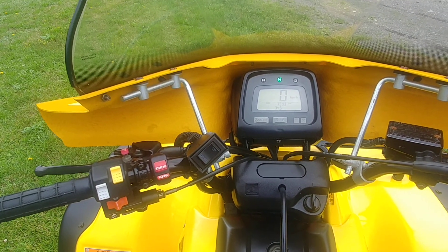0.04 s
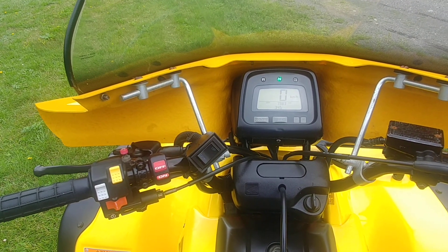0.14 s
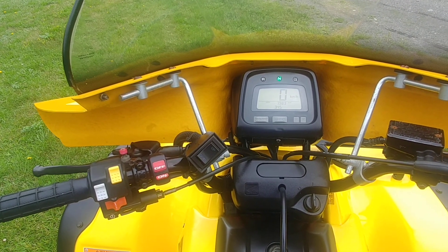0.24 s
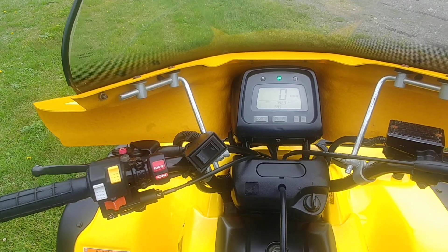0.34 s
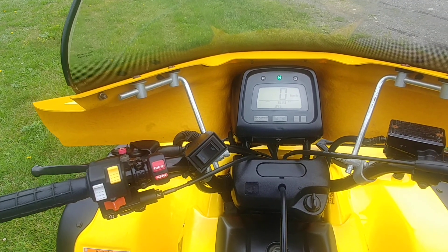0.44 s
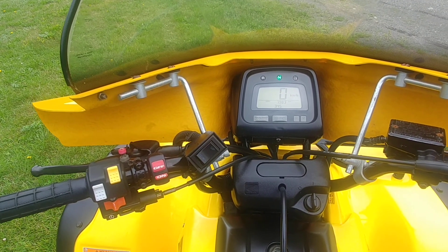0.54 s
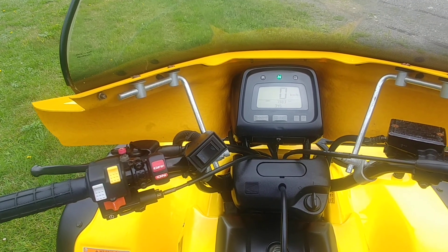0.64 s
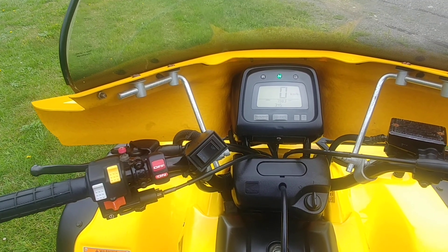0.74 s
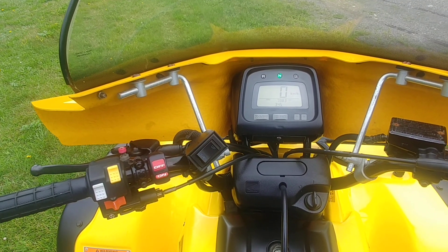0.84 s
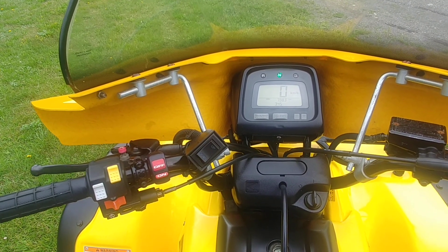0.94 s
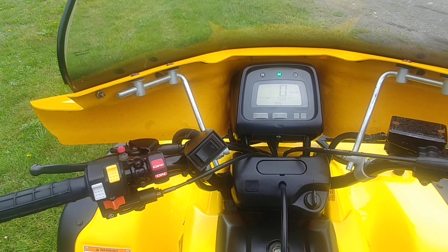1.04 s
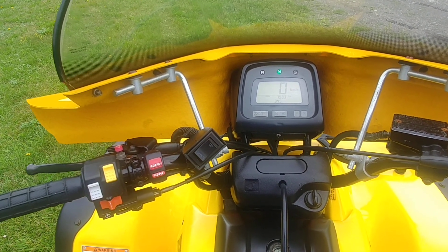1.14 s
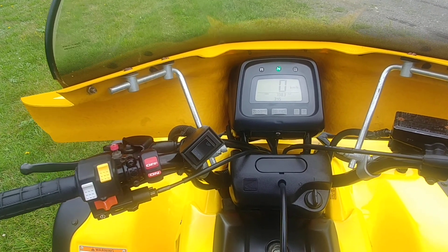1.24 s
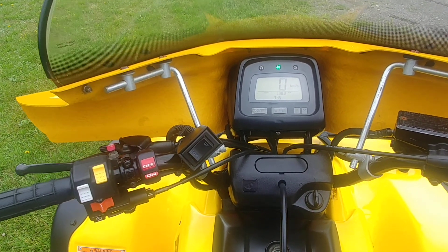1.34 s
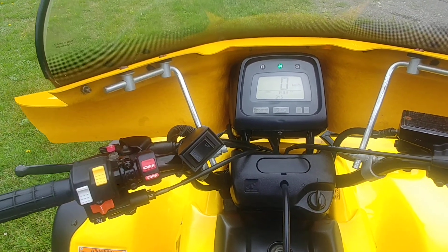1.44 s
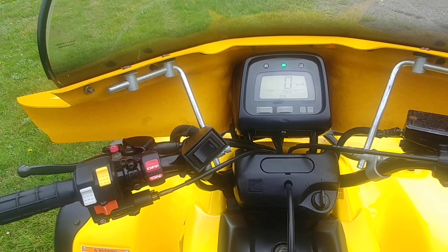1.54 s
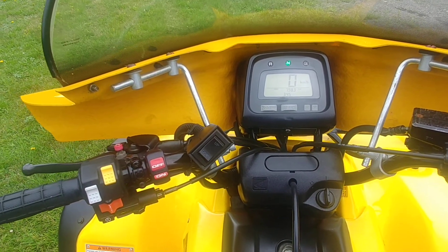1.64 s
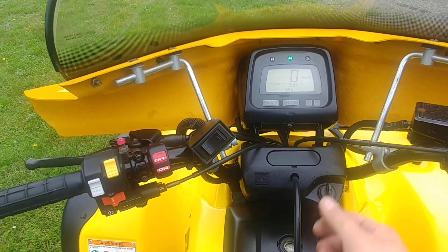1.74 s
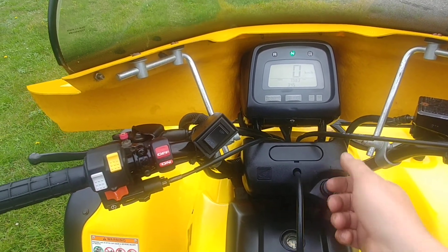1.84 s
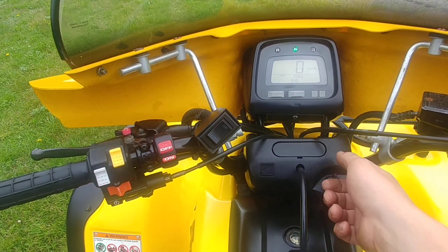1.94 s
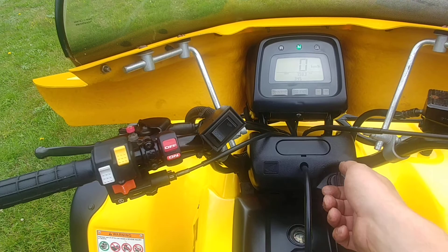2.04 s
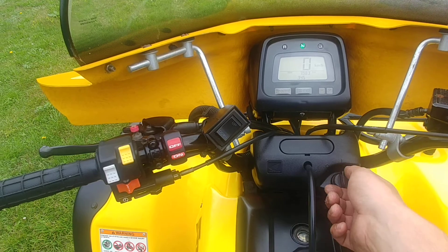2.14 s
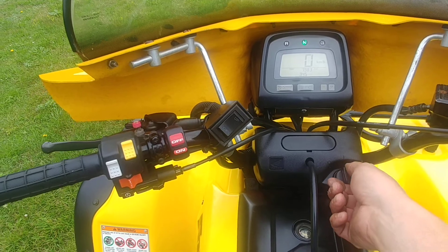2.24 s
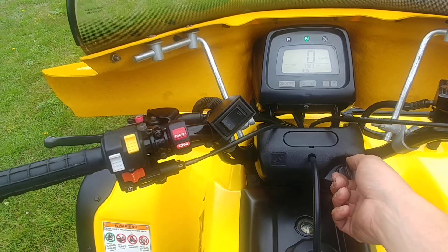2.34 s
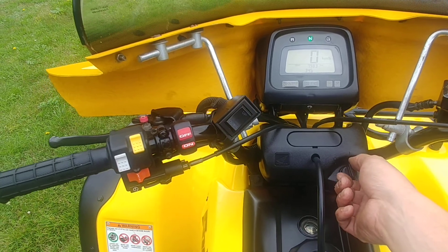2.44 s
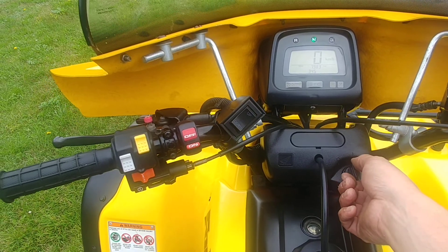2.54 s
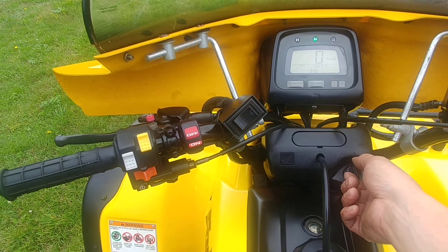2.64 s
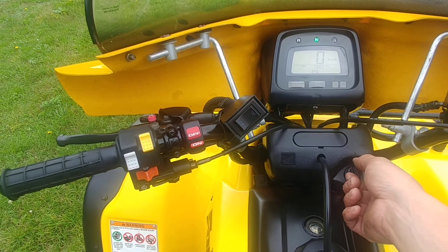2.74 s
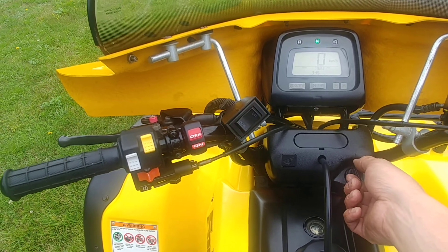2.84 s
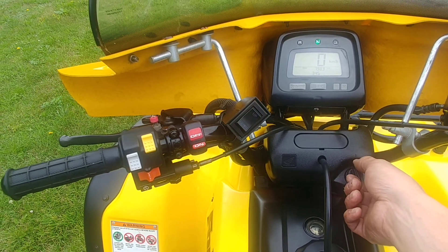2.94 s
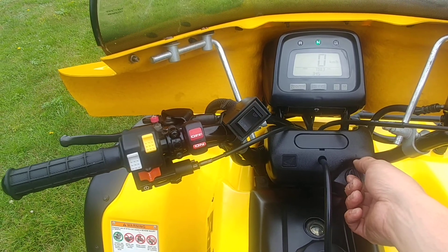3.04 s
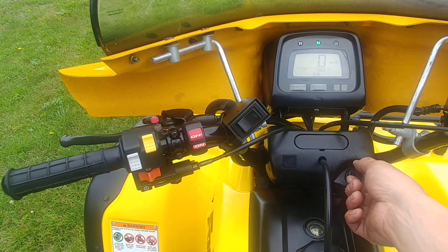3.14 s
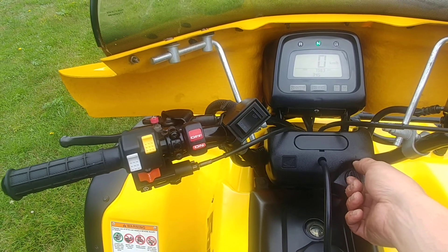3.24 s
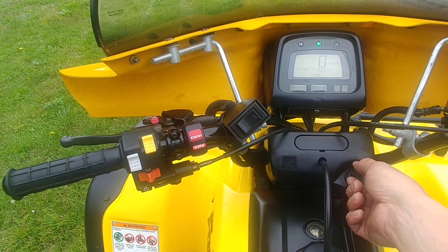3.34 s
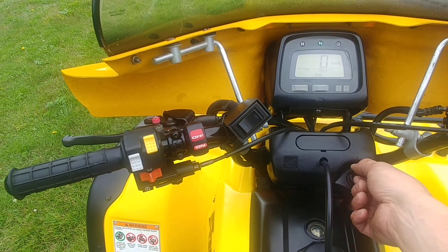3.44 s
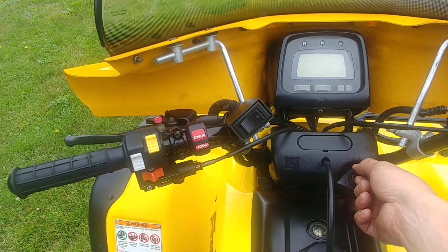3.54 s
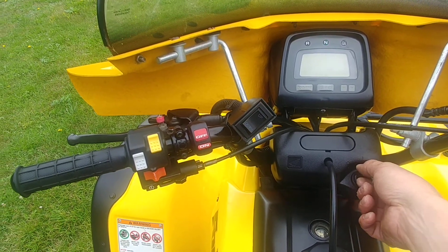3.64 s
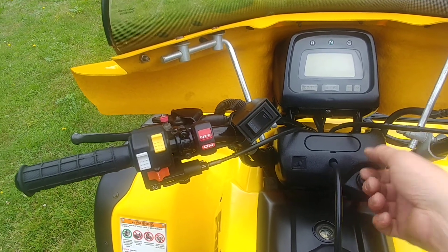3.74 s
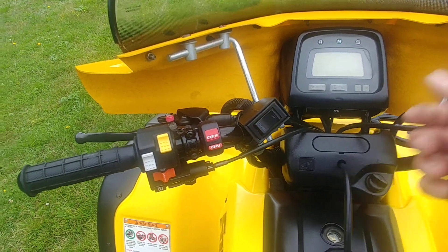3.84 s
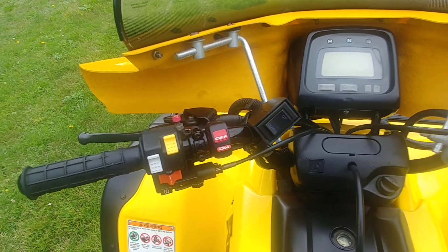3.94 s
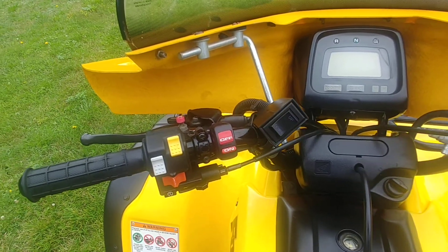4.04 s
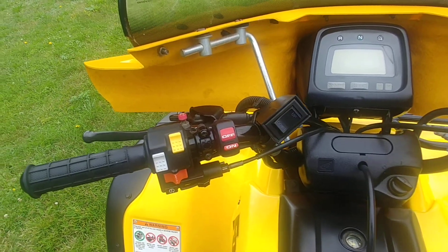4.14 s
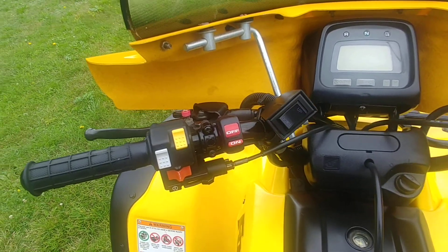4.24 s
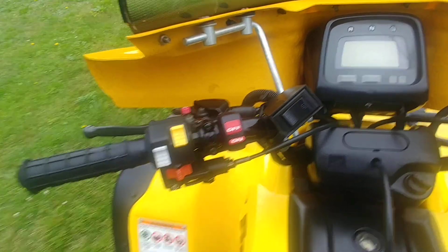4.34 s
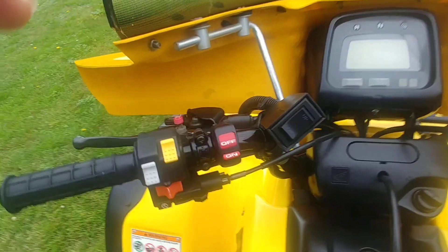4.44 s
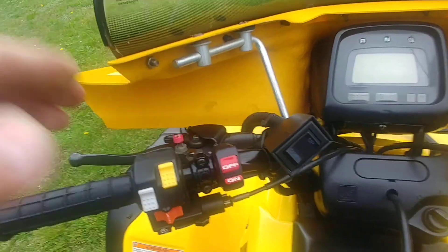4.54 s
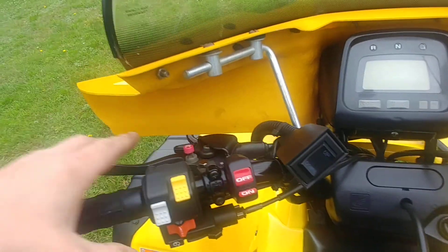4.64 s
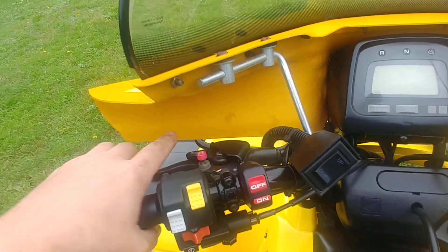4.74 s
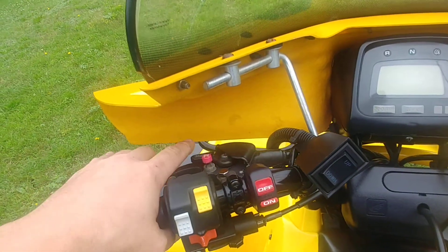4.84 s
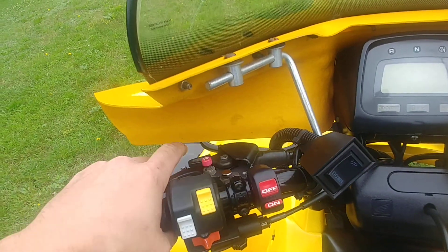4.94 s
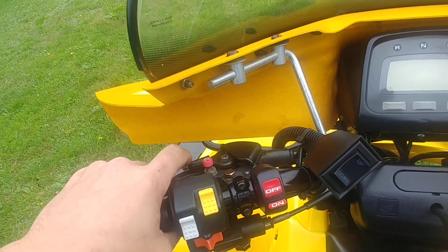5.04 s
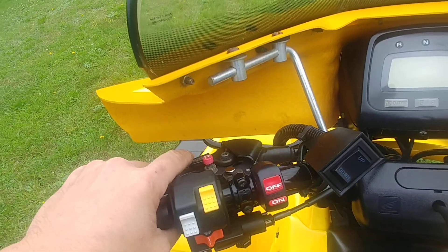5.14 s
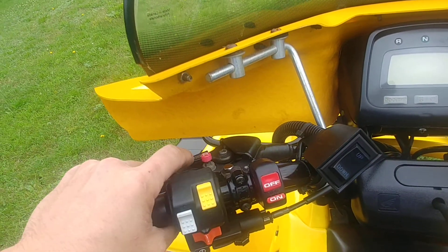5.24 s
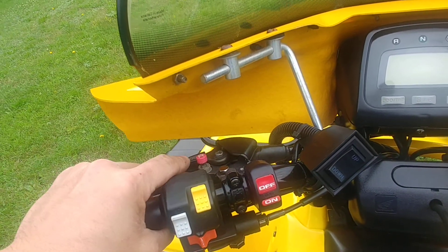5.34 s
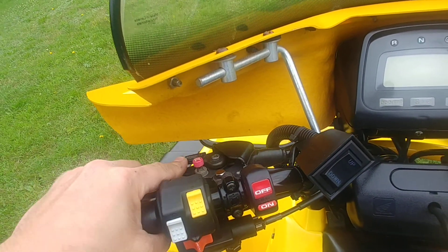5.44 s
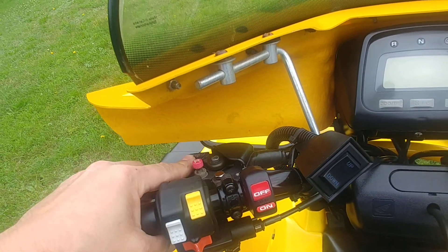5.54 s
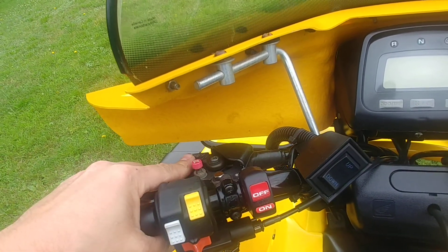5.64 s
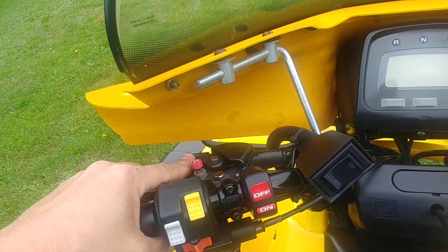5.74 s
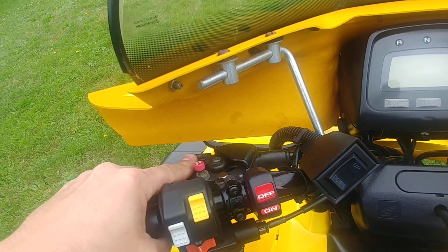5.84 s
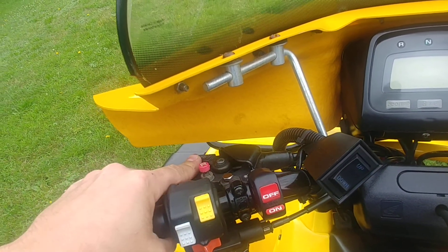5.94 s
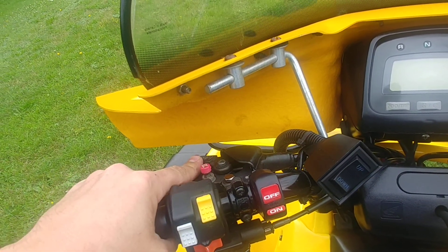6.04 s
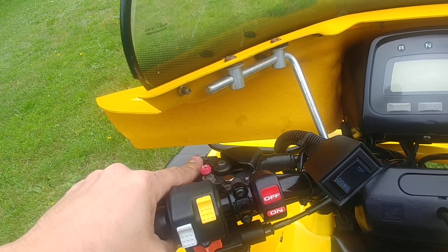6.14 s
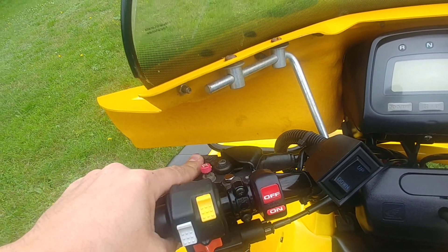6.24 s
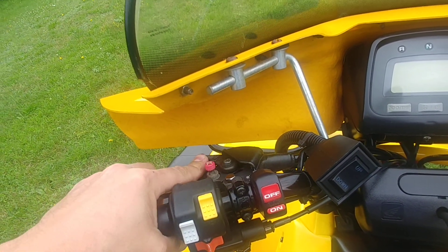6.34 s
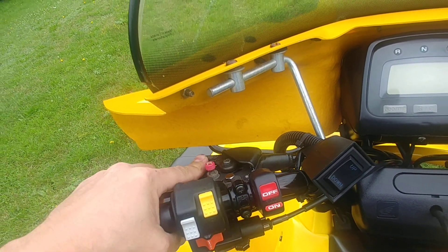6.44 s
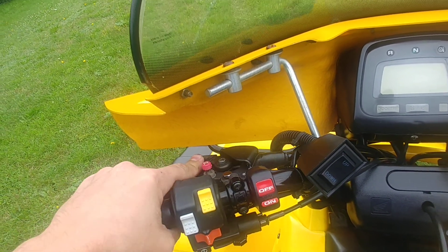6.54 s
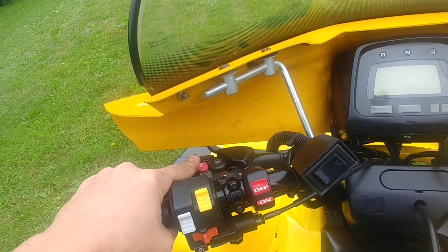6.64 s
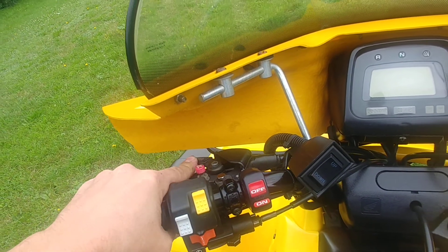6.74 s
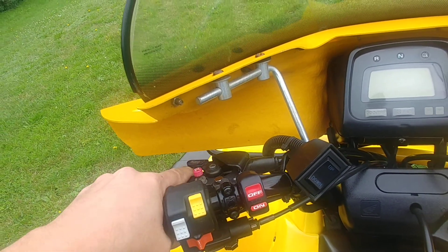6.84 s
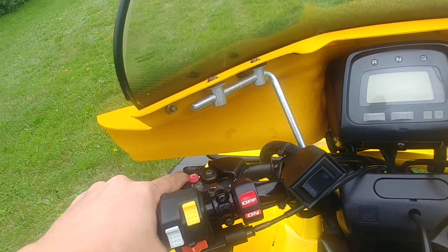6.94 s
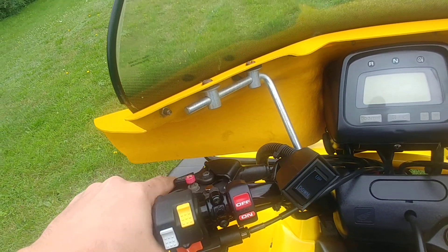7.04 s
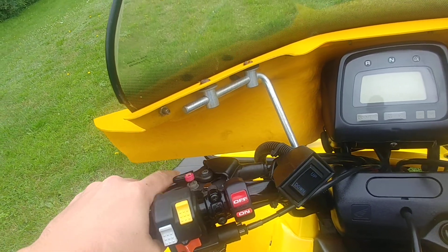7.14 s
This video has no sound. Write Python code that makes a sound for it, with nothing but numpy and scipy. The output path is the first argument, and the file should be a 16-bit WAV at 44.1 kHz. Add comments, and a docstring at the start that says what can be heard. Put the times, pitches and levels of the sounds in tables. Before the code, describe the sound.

Close, hand-held outdoor pickup on a quad bike. A single-cylinder engine chugs loudly at about eleven thumps a second, with valve clatter, hiss and whirr. A key clicks, the beats slow and fade, and the crank kicks back with a short grating ratchet. Then near quiet: clothing rustle, soft knocks, a creaking seat and crisp lever clicks. The left side is brighter; the right is duller, shaded by the hand.

```python
"""Quad bike shut-down

A single-cylinder quad bike idles under a hand-held phone; the key is turned, the engine runs down and kicks back.
Each firing puffs into ringing exhaust modes; noise gated by the engine cycle makes valve clatter, gas hiss and whirr.
The rider shifts in filtered noise, the seat creaks by stick-slip, and levers, knocks and taps ring short modes.
What lies below the phone reaches the right microphone port round the hand: dull, late and blurred.
"""
import sys
import numpy as np
from scipy import signal
from scipy.fft import rfft, irfft
from scipy.io import wavfile
from scipy.ndimage import uniform_filter1d

SR = 44100
rng = np.random.default_rng(int(sys.argv[2]) if len(sys.argv) > 2 else 0)


def volts_from_db(level):
    """Convert decibel levels to linear amplitude ratios."""
    exponent = np.asarray(level, float) / 20
    return 10 ** exponent


def transcribe(u):
    """Save the signal u as a 16-bit wav file named by the first command-line argument.

    u: samples, shape (n,) or (channels, n), limited to [-1, 1]; the rate is SR.
    q: integer samples, one column per channel.
    """
    v = np.clip(np.atleast_2d(u).T, -1, 1)
    q = np.round(v * 32767).astype(np.int16)
    wavfile.write(sys.argv[1], SR, q)


N = 317961
CLOCK = np.arange(N) / SR  # s
SPARK_OFF_S = 3.6
IDLE_PER_S = 11  # firings per second taken as the normal idle


def curve(table):
    """Interpolate each column of a table with times in its first column to every sample."""
    s, *columns = np.transpose(table)
    return [np.interp(CLOCK, s, column) for column in columns]


def colour(x, points):
    """Causal filter through (Hz, dB) points, from the cepstrum of the log gain."""
    hz, db = np.transpose(points)
    grid = np.maximum(np.fft.rfftfreq(8192, 1 / SR), 1)
    log_gain = np.interp(np.log(grid), np.log(hz), db) * np.log(10) / 20
    ceps = irfft(log_gain)
    # folding the cepstrum makes the filter minimum phase
    ceps[1:4096] *= 2
    ceps[4097:] = 0
    return signal.fftconvolve(x, irfft(np.exp(rfft(ceps))))[:N]


def unit(x):
    """Scale to rms 1."""
    return x / np.sqrt(np.mean(x ** 2))


def grit(scatter_db):
    """Noise of tiny impacts whose sizes have a long tail."""
    return unit(rng.standard_normal(N) * volts_from_db(scatter_db * rng.exponential(size=N)))


def walk(rate):
    """Random levels held 1 / rate s and slewed twice."""
    hold = int(SR / rate)
    steps = np.repeat(rng.standard_normal(N // hold + 1), hold)
    return uniform_filter1d(uniform_filter1d(steps, hold), hold)[:N]


def ring(modes, signs=1):
    """Response of a set of (Hz, dB, t60 s) modes to one tap."""
    hz, db, t60 = np.transpose(modes)[:, :, None]
    t = np.arange(SR // 3) / SR
    decay = np.exp(-np.log(1000) * t / t60)
    return (signs * volts_from_db(db) * np.sin(2 * np.pi * hz * t) * decay).sum(axis=0)


def alternating(modes):
    """Signs that make neighbouring modes swing in opposite senses."""
    return (-1.) ** np.arange(len(modes))[:, None]


def sides(left_minus_right_db):
    """Left and right gains, sharing a level difference equally."""
    return volts_from_db(np.array([[left_minus_right_db], [-left_minus_right_db]]) / 2)


def add(track, s, sound):
    """Mix a sound into a track from time s."""
    i = int(s * SR)
    sound = sound[..., max(-i, 0):N - i]
    track[..., max(i, 0):max(i, 0) + sound.shape[-1]] += sound


# Idle speed hunting up and down. Each row: time in seconds, speed in firings per second.
IDLE_SPEED = [(0, 11.007), (.171, 9.782), (.781, 11.86), (1.235, 10.95), (1.651, 10.735), (1.995, 11.012),
              (2.25, 9.89), (2.992, 11.205), (3.6, 11.469)]
# Strokes without a spark. Each row: exhaust trough in seconds, thump level in dB,
# level in dB of the intake chuff before it.
COASTING_STROKES = [(3.6482, -7, -24), (3.765, -6.5, -26.5), (3.9256, -12, -30.5), (4.106, -23, -53.5)]


def strokes():
    """Time, thump, chuff and jet level of every cycle: fired ones from the idle speed, then the coasting ones."""
    first_firing_s = .0649
    thump_db, thump_scatter_db = 0.82, 0.24
    # the chuff is louder at higher speed, the jet when the engine labours
    chuff_db, chuff_db_per_octave, chuff_scatter_db = -23.5, 6.5, 1.
    jet_db, jet_db_per_octave, jet_scatter_db = -29.5, -7, 1.3
    cool_jet_db = -47  # relative to the thump, once nothing burns
    rate = curve(IDLE_SPEED)[0]
    turns = np.cumsum(rate) / SR
    turns -= turns[int(first_firing_s * SR)]
    count = int(turns[int(SPARK_OFF_S * SR)]) + 1
    s = np.interp(np.arange(count), turns, CLOCK)
    s = np.r_[s[0] - 1 / rate[0], s]  # one more cycle before the first firing
    octaves = np.log2(np.interp(s, *np.transpose(IDLE_SPEED)) / IDLE_PER_S)
    chance = rng.standard_normal((3, len(s)))
    fired = [s,
             thump_db + thump_scatter_db * chance[0],
             chuff_db + chuff_db_per_octave * octaves + chuff_scatter_db * chance[1],
             jet_db + jet_db_per_octave * octaves + jet_scatter_db * chance[2]]
    s, db, coasting_chuff_db = np.transpose(COASTING_STROKES)
    return np.hstack([fired, [s, db, coasting_chuff_db, db + cool_jet_db]])


# Exhaust pipe and silencer, firing.
# Each row: mean mode frequency in Hz, mean level in dB, 60 dB decay in seconds.
HOT_PIPE = [(64.3, -4.7, .175), (88.4, 6.4, .102), (105.8, 2.1, .244), (129.5, -3.5, .109),
            (173.7, 2.3, .104)]
# The same pipe blown by cool unburnt gas.
# Each row: mean mode frequency in Hz, mean level in dB, 60 dB decay in seconds.
COOL_PIPE = [(61.6, 6, 0.1), (90.6, 10, 0.16), (130., -27, 0.13), (166, -37.5, 0.075)]


def exhaust(s, thump_db):
    """Each stroke sends a smooth puff of gas into the pipe, whose modes ring as a thump."""
    hot_lead_s, cool_lead_s = .0251, .012  # from the start of the puff to the stroke time
    puff = np.hanning(int(.0091 * SR))
    out = np.zeros(N)
    for start, peak_db in zip(s, thump_db):
        pipe, lead_s = (HOT_PIPE, hot_lead_s) if start < SPARK_OFF_S else (COOL_PIPE, cool_lead_s)
        # gas temperature and charge differ a little each time
        stretch = 1 + 0.0042 * rng.standard_normal()
        modes = [(hz * stretch, db + 0.58 * rng.standard_normal(), t60) for hz, db, t60 in pipe]
        thump = np.convolve(puff / puff.sum(), ring(modes, -alternating(pipe)))
        add(out, start - lead_s, volts_from_db(peak_db) * thump)
    return out


# Colour of the valve gear. Each row: frequency in Hz, relative density in dB per Hz.
CLATTER_COLOUR = [(80, -31), (140, -8), (200, -14), (280, -7.5), (420, -29.5), (700, -18.5), (1030, -15),
                  (1400, -19.5), (1850, -12.5), (2700, -24), (3150, -23.5), (3500, -32.5), (4300, -45.5),
                  (5900, -28), (6450, -17.5), (7000, -37.5), (11000, -50.5)]


def valve_gear(cycle, chuff_db):
    """The valves seat and the intake gulps about half a cycle after the thump, as a gated rattle."""
    jitter = 0.015 * rng.standard_normal(len(chuff_db))
    coming = np.ceil(cycle).astype(int)
    since = (cycle % 1 - .465 - jitter[coming]) % 1  # cycles
    # it dies out as the next thump leaves
    decay = 0.62 * np.exp(-since / 0.083) + 1 / (1 + np.exp((since - .45) / 0.048))
    gate = np.clip(since / 0.035, 0, 1) * decay
    stroke_db = chuff_db[np.ceil(cycle - .45).astype(int)]
    # loose parts of different size rattle each in their own time
    rattle = unit(colour(grit(2.48), CLATTER_COLOUR))
    dull = signal.sosfiltfilt(signal.butter(2, 1400, fs=SR, output="sos"), rattle)
    rattle = volts_from_db(1.1 * walk(70)) * dull + volts_from_db(2.1 * walk(110)) * (rattle - dull)
    return gate * volts_from_db(stroke_db) * rattle


# Colour of the leaking gas. Each row: frequency in Hz, relative density in dB per Hz.
JET_COLOUR = [(8000, -25), (11200, -21.5), (12900, -2.5), (13700, -3), (15100, 0.5), (16000, -26)]


def gas_jet(cycle, jet_db):
    """Gas leaks out in a thin hissing jet while the exhaust valve opens."""
    opening = np.exp(-np.abs((cycle % 1 - .85) / .105) ** 2.5)
    level_db = jet_db[np.ceil(cycle).astype(int)] + 1.7 * walk(150)
    return opening * volts_from_db(level_db) * unit(colour(grit(3.5), JET_COLOUR))


# Colour of the turning parts. Each row: frequency in Hz, relative density in dB per Hz.
WHIRR_COLOUR = [(25, -25.5), (73, -3), (100, -15.5), (125, -18.5), (260, -16.5), (420, -36.5),
                (1000, -22.5), (1810, -21), (3200, -30), (4300, -36.5), (5600, -31), (6450, -25.5),
                (7000, -37), (10600, -52), (13800, -41.5), (16000, -59)]
# Ringing of the engine casing. Each row: mode frequency in Hz, relative level in dB, 60 dB decay in seconds.
CASING_MODES = [(1800, 2.5, 0.086), (2070, -4, 0.081), (2340, -8, 0.096), (3093, -3, 0.068),
                (5740, -14.5, .06), (8100, -14, 0.067), (8290, -12, 0.039)]


def whirr(cycle, s):
    """Crank and chain whirr as coloured grit and a ringing casing, swelling with speed and load."""
    whirr_db, whirr_db_per_octave, casing_db = -26, 8, -11.0
    # the crank all but stops on the last compression
    stall_s, stall_fade_s, stall_drop_db = 3.96, 0.1, -10
    speed = np.interp(CLOCK, (s[1:] + s[:-1]) / 2, 1 / np.diff(s))
    octaves = np.log2(speed / IDLE_PER_S)
    stall_db = stall_drop_db * np.clip((CLOCK - stall_s) / stall_fade_s, 0, 1)
    # the crank turns twice a cycle and loads the chain unevenly
    phase = cycle % 1
    load_db = 0.81 * np.cos(4 * np.pi * (phase - .12)) + 0.18 * np.cos(2 * np.pi * (phase - .62))
    uneven = 1 - 3.1 * np.minimum(octaves, 0)  # a slow crank lurches more
    level_db = whirr_db + whirr_db_per_octave * octaves + stall_db + uneven * load_db + 2.0 * walk(40.)
    casing = unit(signal.fftconvolve(grit(2.2), ring(CASING_MODES))[:N])
    return volts_from_db(level_db) * (unit(colour(grit(1.2), WHIRR_COLOUR)) + volts_from_db(casing_db) * casing)


def engine():
    """Exhaust thumps, and three noises timed by the four-stroke cycle."""
    stop_s, stop_fade_s = 4.17, 0.024
    s, thump_db, chuff_db, jet_db = strokes()
    cycle = np.interp(CLOCK, s, np.arange(len(s)))
    running = np.clip((stop_s - CLOCK) / stop_fade_s, 0, 1)
    moving_parts = valve_gear(cycle, chuff_db) + whirr(cycle, s)
    return exhaust(s, thump_db) + gas_jet(cycle, jet_db) + running * moving_parts


# Colour of the open air. Each row: frequency in Hz, relative density in dB per Hz.
AIR_COLOUR = [(180, -19), (300, -5.5), (400, -15), (500, -2), (780, -5), (1300, -9), (2250, -16),
              (4000, -14.5), (5160, -9), (7000, -17.5), (10600, -43.5), (13000, -37.5), (16000, -34)]


def open_air():
    """Steady coloured noise, independent at the two ports and 6.9 dB weaker on the right."""
    ports = [unit(colour(rng.standard_normal(N), AIR_COLOUR)) for _ in range(2)]
    return volts_from_db(-53 - 6.9 * np.array([[0], [1]])) * ports


# Clothes and hand rubbing. Each row: time in seconds, mean rumble level in dB, mean rustle level in dB.
RUBBING = [(3.8, -35, -45.5), (3.95, -30, -43), (4.05, -43, -44.5), (4.22, -33, -39.5), (4.36, -42.5, -52),
           (4.6, -47, -67), (4.78, -39.5, -45), (4.92, -42.5, -54.5), (5.07, -49, -54.5), (5.4, -48, -65.5),
           (5.65, -40, -55.5), (6.0, -43, -42), (6.22, -48.5, -56), (6.35, -31.5, -62), (6.55, -46, -55.5),
           (6.94, -32.5, -52), (7.12, -46, -59), (7.21, -38, -48)]


def rider():
    """Rumble and rustle of shifting weight, the rumble partly different at each port."""
    rumble_db, rustle_db = curve(RUBBING)
    deep = [(25, -62.5), (60, 1.5), (100, 3.0), (200, -6), (350, -10), (900, -69.0)]  # (Hz, dB)
    cloth = [(150, -30), (400, 0), (900, -4), (1500, -13), (3000, -30), (6000, -50)]  # (Hz, dB)
    common, apart = (unit(colour(grit(2.0), deep)) for _ in range(2))
    rumble = common + 0.54 * apart * np.array([[1], [-1]])
    rustle = unit(colour(grit(3.), cloth))
    return volts_from_db(rumble_db + 4.8 * walk(18)) * rumble + volts_from_db(rustle_db + 3.4 * walk(35)) * rustle


# Key, levers and clutch. Each row: start in seconds, peak level of the body on the left in dB,
# gain of the snap in dB, centre of the ring in Hz, focus in dB added one octave off centre.
CONTROL_CLICKS = [(3.506, -6.5, 4.5, 1300, -17), (4.14, -17.5, -2.5, 1800, -15),
                  (4.387, -26, -34, 1500, 0.5), (4.395, -28.5, -26.5, 930, -15.5),
                  (4.429, -34, -32, 1800, 3.5), (6.343, -6.5, -28.5, 664, -23),
                  (6.694, -32.5, -46, 1200, 4), (6.737, -3.5, 5.5, 1350, -3.5),
                  (6.836, -24.5, -42, 834, -9), (6.856, -4.5, 2.5, 850, -4.5), (7.095, -31, -29.5, 980, -6)]
# Housing of the controls. Each row: mean mode frequency in Hz, level in dB before focus, 60 dB decay in seconds.
HOUSING_MODES = [(380, -4, .03), (565, 0, .03), (700, -2, .025), (850, 0, .025), (970, 0, .03),
                 (1150, -2, .025), (1290, -2, .025), (1440, -3, .025), (1700, -3, .025), (1990, 0, .014),
                 (2560, -8, .012)]
# Colour of the snap. Each row: frequency in Hz, gain in dB.
SNAP_COLOUR = [(1470, -60), (2500, 0), (4050, -1.5), (4580, 0.5), (5740, 4), (6550, 11), (7300, 0),
               (8870, -3), (10300, -22), (12700, -8.5), (16000, -27)]


def clicks():
    """A short rattle of contacts: a bright snap at once, the housing ringing and buzzing after it."""
    snaps, body = np.zeros((2, N)), np.zeros((2, N))
    t = np.arange(SR // 6) / SR
    side = volts_from_db(np.array([[0], [-7.5]]))  # weaker on the right
    rattle = (1 - np.exp(-t / 0.0033)) * (np.exp(-t / 0.0058) + .05 * np.exp(-t / 0.025))
    for s, body_db, snap_db, centre_hz, focus_db in CONTROL_CLICKS:
        contacts = rng.standard_normal((3, len(t))) * rattle
        detune = 1 + 0.034 * rng.standard_normal(len(HOUSING_MODES))
        modes = [(hz * d, db + focus_db * np.log2(hz / centre_hz) ** 2, t60)
                 for (hz, db, t60), d in zip(HOUSING_MODES, detune)]
        rung = signal.fftconvolve(contacts[0], ring(modes, alternating(modes)))
        add(body, s, side * volts_from_db(body_db) * rung / np.abs(rung).max())
        add(snaps, s, side * volts_from_db(snap_db) * contacts[1:] * (np.exp(-t / 0.008) + .03))
    return body + [colour(port, SNAP_COLOUR) for port in snaps]


# Colour of the slipping teeth. Each row: frequency in Hz, relative density in dB per Hz.
RATCHET_COLOUR = [(71, -20), (120, -31), (163, -12), (196, 3), (278, -1.5), (393, -45), (630, -10),
                  (1260, -18.5), (1750, 6.5), (2200, -3), (3170, -8.5), (4060, -20), (6630, -17),
                  (10400, -43), (16000, -94)]


def kick():
    """The crank swings back against the starter clutch; uneven teeth slip about 70 times a second, then ring out."""
    start_s, attack_s, slip_s = 4.139, .003, .078
    kick_db, sag_db_per_s, drop_db, tail_db_per_s = -6, -95, -7.5, -155
    t = CLOCK - start_s
    teeth = np.exp(-((t * 68 + .5 * walk(40)) % 1) / 1.1)
    after = np.clip(t - slip_s, 0, 1)
    slip_db = kick_db + sag_db_per_s * np.clip(t, 0, slip_s)
    tail_db = drop_db * np.clip(after / 0.011, 0, 1) + tail_db_per_s * after
    attack = np.clip(t / attack_s, 0, 1) ** 2
    grating = unit(colour(grit(2.4), RATCHET_COLOUR))
    return attack * volts_from_db(slip_db + tail_db) * np.where(after > 0, .6, teeth) * grating


# Knocks of hand and body on phone and bike. Each row: start in seconds, level in dB, pitch in Hz,
# left minus right in dB before the hand's shade, rustle level in dB.
KNOCKS = [(4.414, -26.5, 100.4, 19, -29), (4.431, -19.5, 80, 21, -46), (4.496, -29.5, 75.5, 24, -50),
          (4.565, -22.5, 99, 15.5, -42), (4.66, -25.5, 84, 24, -61), (4.759, -18.5, 111.8, 0, -30),
          (4.798, -24, 67.6, 2, -36), (4.88, -25, 61.5, 2, -37), (4.982, -25, 201, 4, -33),
          (5.009, -27.5, 179, 4, -33), (6.356, -11, 177, 2, -18.5)]


def thuds():
    """Soft blows: a short push rings the struck part and sets off a brief rustle."""
    swings = 9.2  # of the main mode until 60 dB down
    out, t = np.zeros((2, N)), np.arange(SR // 10) / SR
    push = np.hanning(int(.002 * SR))
    cloth = signal.butter(2, [300, 1500], "band", fs=SR, output="sos")
    for s, db, hz, pan_db, rustle_db in KNOCKS:
        modes = [(hz, 0, swings / hz), (1.8 * hz, -8., .03)]
        knock = volts_from_db(db) * np.convolve(push / push.sum(), ring(modes))
        rustle = signal.sosfilt(cloth, rng.standard_normal(len(t))) * np.exp(-t / 0.015)
        add(knock, 0, volts_from_db(rustle_db) * rustle)
        add(out, s, sides(pan_db) * knock)
    return out


# Fingertip taps on the right of the phone. Each row: start in seconds, level in dB, pitch in Hz,
# left minus right in dB before the hand's shade.
FINGER_TAPS = [(4.591, -16, 261, -11), (5.717, -23.5, 254, -20), (6.321, -13, 264, -15),
               (6.932, -11.5, 238, -8), (6.991, -24.5, 523, -1), (7.064, -17.5, 260, -16.5)]


def taps():
    """Dead little pops: two quickly damped modes with their onset smoothed, little more than one swing."""
    out = np.zeros((2, N))
    for s, db, hz, pan_db in FINGER_TAPS:
        swing = ring([(hz, 0, .014), (2.4 * hz, -6., .008)])
        pop = -uniform_filter1d(np.pad(swing, (40, 0)), size=40)
        add(out, s, volts_from_db(db) * sides(pan_db) * pop)
    return out


# Modes of the seat pan. Each row: frequency in Hz, level in dB, 60 dB decay in seconds.
SEAT_PAN = [(284, -2, 0.037), (584, -5.5, 0.045), (710, 6.5, 0.017), (831, -1, 0.053), (914, 3, 0.02),
            (1350, -18, 0.011), (1950, -10, 0.0074)]
# Two creaks, each slowing as it ends, one list each.
# Each row: time in seconds, slips per second, mean peak level of a slip in dB.
SEAT_CREAKS = [
    [(5.51, 64, -42), (5.56, 57.6, -29), (5.63, 47.7, -25), (5.66, 26, -35.5), (5.715, 20, -29),
     (5.75, 19, -35)],
    [(5.767, 41, -32), (5.82, 41.2, -28.5), (6.04, 41, -23.5), (6.12, 33.4, -35), (6.17, 22.2, -23),
     (6.26, 12.5, -36)],
]


def seat():
    """Stick-slip: each slip is a soft jerk of the seat pan, with finer slips trailing it and a scrape between."""
    slip_jitter_s, slip_scatter_db = .002, 2
    scrape_db = -19  # relative to the slips' level
    out, t = np.zeros(N), np.arange(SR // 15) / SR
    pan = ring(SEAT_PAN, alternating(SEAT_PAN))
    jerk = (1 - np.exp(-t / 0.0011)) * np.exp(-t / 0.0055) + 0.14 * np.exp(-t / 0.024)
    scrape = unit(signal.fftconvolve(grit(3.3), pan)[:N]) * volts_from_db(2.5 * walk(60))
    for rows in SEAT_CREAKS:
        rate, db = curve(rows)
        edge = np.clip(np.minimum(CLOCK - rows[0][0], rows[-1][0] - CLOCK) / .02, 0, 1)
        out += edge * volts_from_db(db + scrape_db) * scrape
        slips = np.cumsum(rate * (edge > 0)) / SR
        for i in np.searchsorted(slips, np.arange(int(slips[-1]) + 1), side="right"):
            late, louder = rng.standard_normal(2)
            creak = signal.fftconvolve(rng.standard_normal(len(t)) * jerk, pan)
            level = volts_from_db(db[i] + slip_scatter_db * louder)
            add(out, i / SR + slip_jitter_s * late, level * creak / np.abs(creak).max())
    return out


# Swell of the low hum. Each row: time in seconds, mean level in dB.
HUM_LEVEL = [(5.7, -74), (5.85, -41), (6.3, -39.5), (6.6, -48.5), (6.75, -75)]


def hum():
    """A faint low sine comes and goes, wavering a little in level and pitch."""
    hz = 121.2 + 3.4 * walk(7.4)
    level = volts_from_db(curve(HUM_LEVEL)[0] + 1.55 * walk(12.2))
    return level * np.sin(2 * np.pi * np.cumsum(hz) / SR)


# Shade of the hand over the right port. Each row: frequency in Hz, loss in dB.
HAND_SHADE = [(300, 8), (700, 8), (1290, 13), (2380, 17.5), (4400, 8), (5600, 13.5), (6450, 21),
              (7300, 11.5), (8500, 3.5), (11500, 16.5), (15000, 12.5)]


def shaded(x):
    """Treble creeps round the hand to the right port late and scattered, the paths shifting as the hand moves."""
    low = signal.sosfiltfilt(signal.butter(1, 600, fs=SR, output="sos"), x)
    high = signal.sosfilt(signal.butter(2, 250, "high", fs=SR, output="sos"), x)
    t = np.arange(SR // 6) / SR
    paths = [signal.fftconvolve(high, rng.standard_normal(len(t)) * np.exp(-t / .012))[:N] for _ in range(2)]
    turn = 2.5 * walk(9)  # radians
    scattered = np.cos(turn) * paths[0] + np.sin(turn) * paths[1]
    late = np.pad(x - .6 * low, (int(.0002 * SR), 0))[:N]
    round_hand = volts_from_db(-14.5) * late + volts_from_db(-23.5) * scattered
    return volts_from_db(-3.0) * low + colour(round_hand, [(hz, -loss_db) for hz, loss_db in HAND_SHADE])


def scene():
    """What is below the phone is shaded on the right; the controls in front and the open air reach both ports."""
    # the grip on the phone damps the slowest sway
    grip = signal.butter(3, 48, "high", fs=SR, output="sos")
    left_side = volts_from_db(np.array([[1.5], [-2.5]]))  # the rider leans to the left
    leaning = left_side * (seat() + hum() + signal.sosfilt(grip, rider()))
    handling = signal.sosfilt(grip, thuds() + taps())
    below = engine() + kick() + leaning + handling
    return np.array([below[0], shaded(below[1])]) + clicks() + open_air()


def top_cut(x):
    """Nothing passes above the cut-off."""
    return signal.sosfilt(signal.butter(12, 16800, fs=SR, output="sos"), x)


def record(dry):
    """Peaks are rounded at full scale."""
    ports = volts_from_db(0.89) * dry
    mix = ports / (1 + np.abs(ports) ** 8) ** (1 / 8)
    return top_cut(mix)


dry = scene()
out = record(dry)
transcribe(out)
```